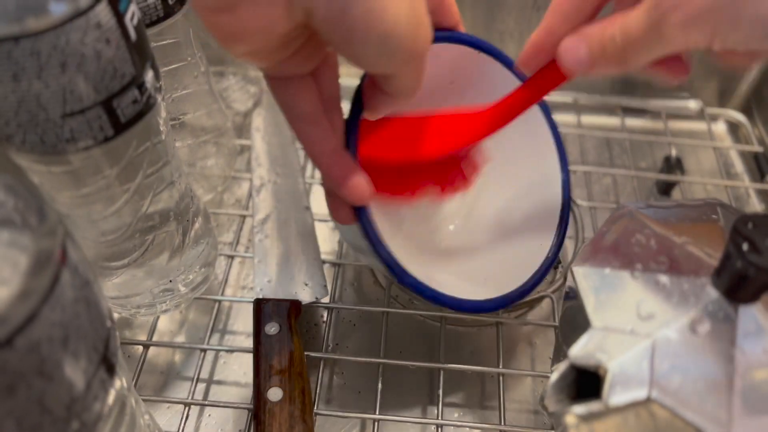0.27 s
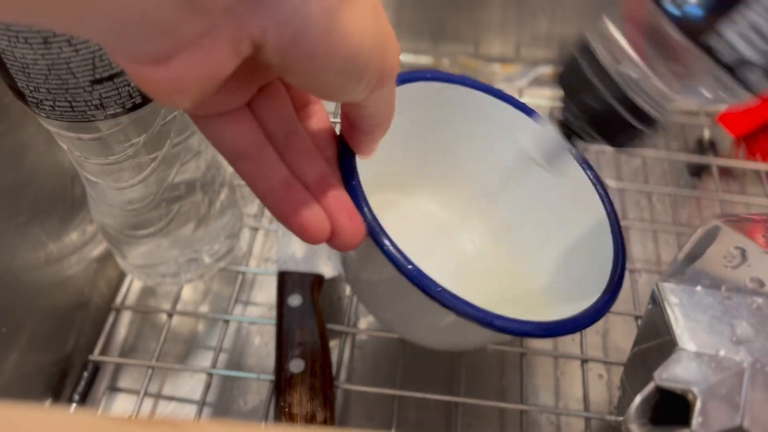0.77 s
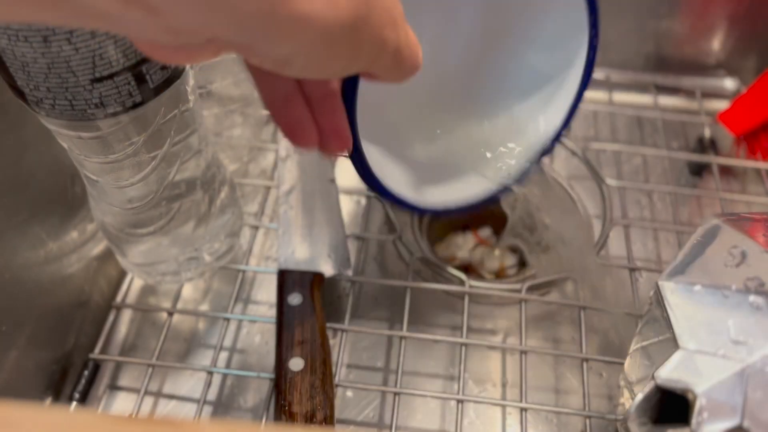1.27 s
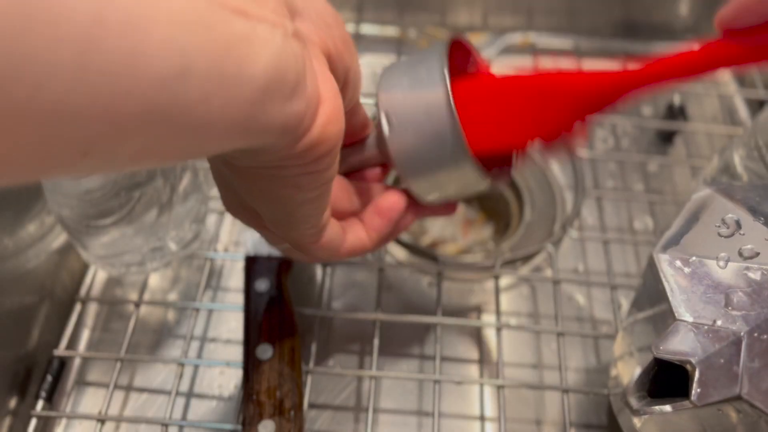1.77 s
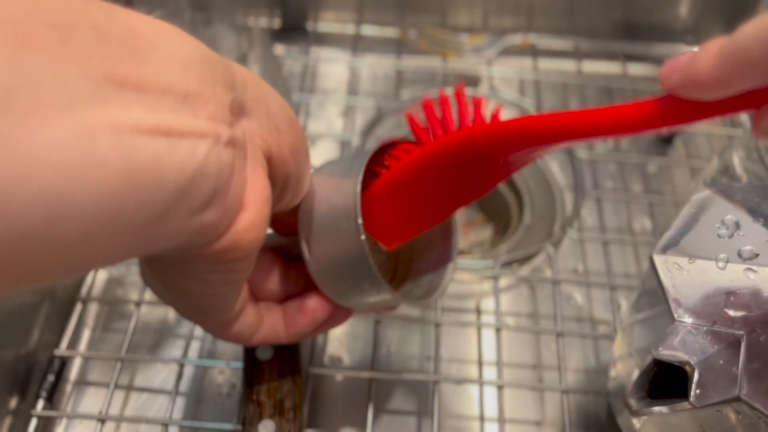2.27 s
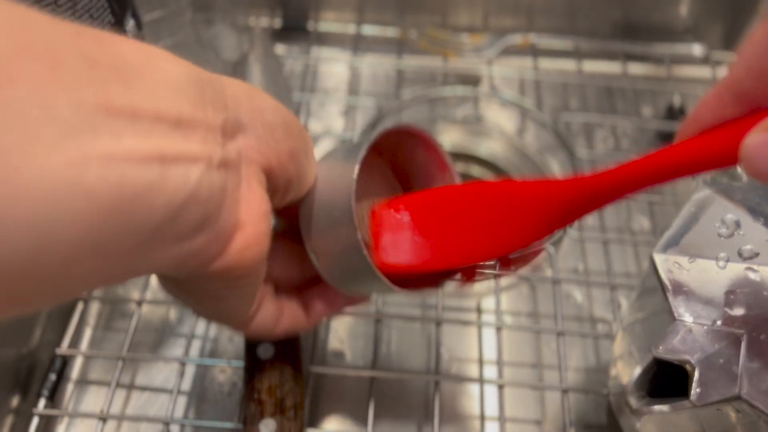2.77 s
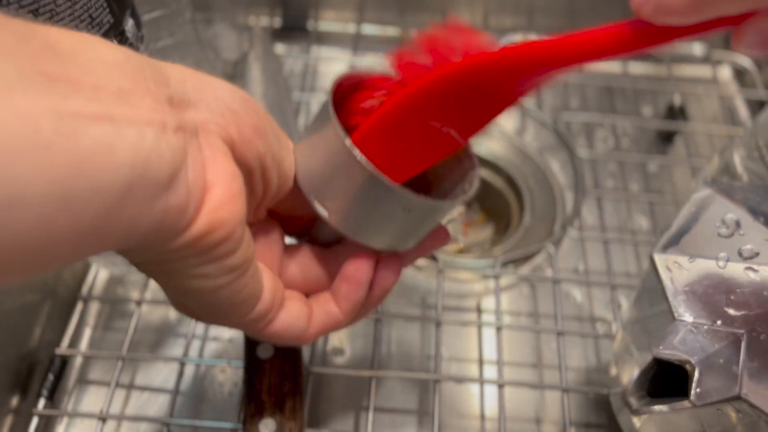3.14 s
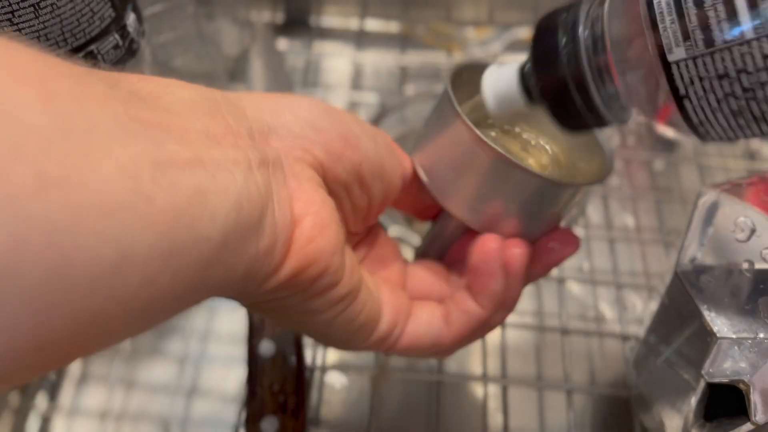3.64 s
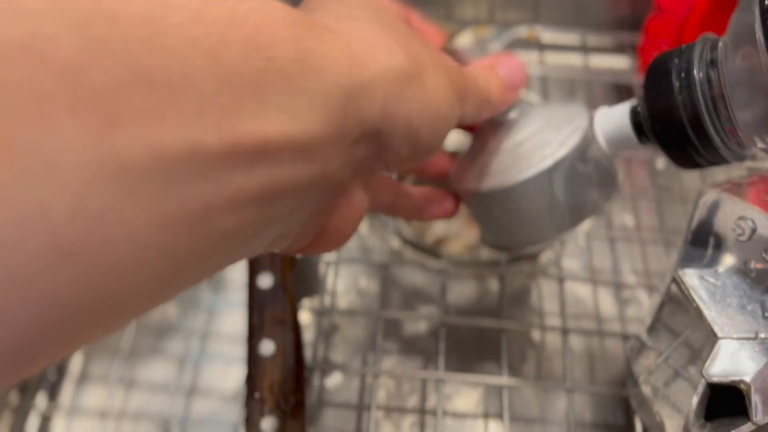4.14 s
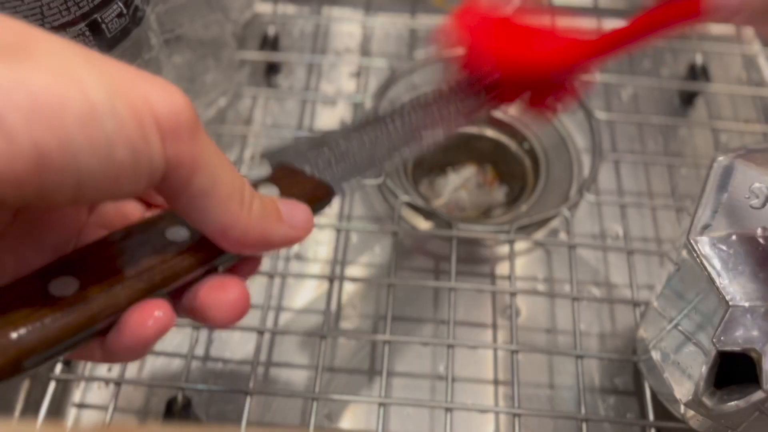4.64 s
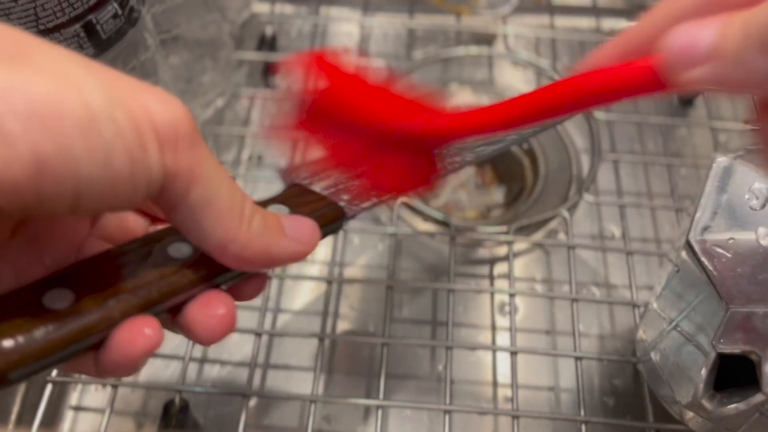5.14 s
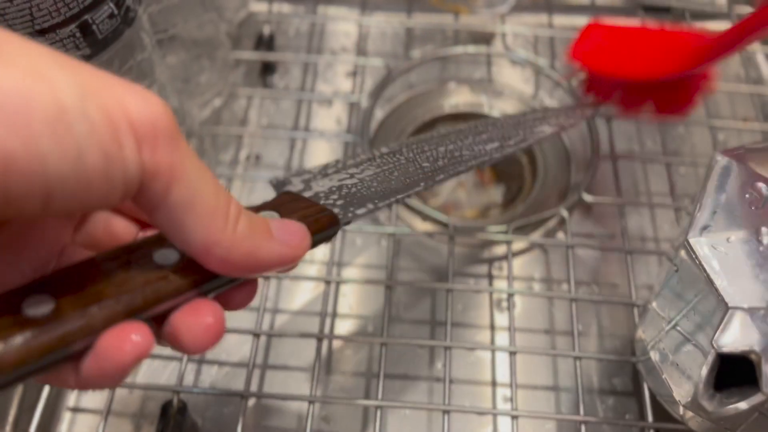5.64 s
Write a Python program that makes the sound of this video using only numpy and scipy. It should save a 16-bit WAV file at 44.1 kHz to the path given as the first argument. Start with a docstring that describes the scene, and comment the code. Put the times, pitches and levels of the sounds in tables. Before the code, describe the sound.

Dishes are scrubbed by hand in a steel sink, heard close up with a tight basin echo over a low kitchen rumble. First come hollow knocks of a brush in an enamel bowl, then sloshing suds and a spurt from a soap bottle. Scratchy twists and clanks follow inside a small metal funnel. After two more soap spurts, wet clicks and a dull finger rub, bright, rapid brush strokes run over a knife blade.

```python
"""A plastic brush knocks and turns in an enamel bowl, down in a steel sink, close to a phone's microphone.
Suds crackle, drip and gurgle, and a soap bottle sputters three times as air tears through its nozzle.
The brush twists in a small aluminium funnel, wet fingers roll the funnel over, and the bristles sweep
to and fro along a knife blade. Bristle flicks and knocks ring each dish's own resonances.
The basin echoes close by, and the kitchen's low drone lies under everything."""
import sys
import numpy as np
from scipy import signal
from scipy.fft import rfft, irfft, next_fast_len
from scipy.io import wavfile
from scipy.ndimage import uniform_filter1d, map_coordinates

SR = 44100
rng = np.random.default_rng(int(sys.argv[2]) if len(sys.argv) > 2 else 0)


def store_wav(level_fs):
    """Save 16-bit WAV to argv[1]."""
    pcm = np.round(np.clip(np.atleast_2d(level_fs), -1, 1) * 32767)
    wavfile.write(sys.argv[1], SR, pcm.T.astype(np.int16))


N = 260190
TIME = np.arange(N) / SR
SIDES = np.array([[.5], [-.5]])  # half of a difference goes to each microphone port

# Levels in the tables are relative. "Fastest" is the share of a movement at which its speed peaks.
# Turns of the brush in the bowl. Each row: start and length in seconds, fastest, level in dB.
BOWL_TURNS = [(0, 0.055, 0.53, -32), (0.081, 0.14, 0.13, -44.5), (0.332, 0.26, 0.24, -46.5)]
# The brush head striking each dish. Each row: time in seconds, level in dB, hollow low modes in dB,
# hard crack in dB, pitch ratio set by grip and brush depth.
BOWL_KNOCKS = [(.0098, -20, -1, 5.5, 1.08), (.0295, -19.5, 1.5, -0.5, 0.99),
               (.2625, -17.5, 1, -10.5, 1.046), (.2995, -20, -3, -1, 0.99), (.5038, -17, -8, 3.5, 1.02),
               (.523, -29.5, -2, -3.5, 1.03)]
FUNNEL_KNOCKS = [(1.431, -22, -23, 4.5, 0.95), (1.439, -25.5, -10, 3, 1), (1.476, -30, -5, -15, 0.94),
                 (1.54, -29, -3, -0.5, 1.04), (1.617, -10.5, 3.5, -2, 0.99), (1.869, -14, 6.5, -1.5, 1.02),
                 (1.879, -28.5, 17, 1, 1.03), (1.94, -35, 7, -3, 1.03), (1.958, -30.5, 13, 0.5, 1.07),
                 (1.999, -20.5, -14, -7.5, 0.98), (2.033, -26, -10, -13, 0.94),
                 (2.058, -23.5, -14, -4, 0.91), (2.298, -31, 8, -12, 1.02), (2.424, -26, -3, -2, 1.08),
                 (2.665, -37, 13, 0, 1.04), (2.883, -26, -13, 3, 1.07), (3.157, -35.5, 9, -9, 0.93),
                 (3.243, -30, 13, -2, 1.03), (3.277, -29.5, 1, -4, 0.93), (3.322, -28.5, -8, 1, 0.91),
                 (3.346, -33, 17.5, 3.5, 1.03)]
# What a knock rings. Each row: pitch in Hz, level in dB, t60 in seconds.
BOWL_MODES = [(415, -19.5, 0.032), (551, -7, 0.08), (640, 0, 0.016), (850, -6.5, 0.056), (967, -5, 0.037),
              (1485, 0.5, 0.028), (2020, 3.5, 0.016), (2190, -0.5, 0.016), (2305, -2, 0.025),
              (2510, -2, 0.017), (3100, -3, 0.024), (4050, -10.5, 0.035), (4650, -19, 0.035)]
FUNNEL_MODES = [(555.5, -11.5, 0.055), (885, -18, 0.03), (996, -19, 0.035), (1330, -6.5, 0.028),
                (1388, -2.5, 0.04), (1500, -4.5, 0.032), (1676, -9.5, 0.038), (1770, -5, 0.026),
                (1951, -13, 0.02), (2290, -11, 0.017), (3754, -14, 0.018), (4330, -9, 0.013)]
# Resonances that the bristles excite. Each row: centre and width in Hz, level in dB.
BOWL_RUB = [(1490, 73, -10.5), (2506, 51, 1), (3240, 150, -20), (4034, 33, -6.5), (4650, 65, -24.5),
            (4950, 50, -13), (5916, 44, -10), (6930, 77, -10)]
FUNNEL_RUB = [(554, 41, 1.5), (664, 85, -9), (1000, 46, -5), (1260, 22, -7.5), (1359, 38, 9.5),
              (1504, 53, 3.5), (1680, 82, 2), (1788, 56, 5), (2003, 62, 2.5), (2581, 108, -8),
              (3110, 300, -6.5), (3780, 102, -7.5)]
BLADE_RASP = [(1726, 860, -14), (2953, 200, -0.5), (3100, 300, -3), (4430, 750, -5), (5060, 510, -6),
              (6870, 420, 2.5)]
# Bristle hiss from close up. Each row: frequency in Hz, spectral level in dB.
BOWL_HISS = [(200, -24), (800, 1), (1200, -21.5), (3000, -27), (6000, -4), (8000, 18.5), (14000, 26.5),
             (16000, -11)]
FUNNEL_HISS = [(300, -20), (1500, -15), (2600, -5), (4200, -6), (6200, -5), (8500, -8), (11000, -0.5),
               (12800, 1.5), (14000, -1.5), (16000, -7.5)]
BLADE_HISS = [(300, -50), (1900, -24), (2500, -13.5), (2900, -12), (3500, -10), (4500, -5), (5800, -4),
              (8000, -1.5), (11000, 7.5), (14000, 4.5), (16000, 1.5)]

# The kitchen's rumble. Each row: frequency in Hz, spectral level in dB.
RUMBLE_SPECTRUM = [(20, -27), (35, -6.5), (50, 7.5), (95, 5), (125, 1), (175, -4.5), (260, -19),
                   (450, -11.5), (700, -15.5), (1000, -43), (2000, -65), (7000, -38.5)]
# The room's low resonances. Each row: centre and width in Hz, level in dB.
ROOM_MODES = [(58.6, 4.3, 4.5), (90.1, 10.3, -1), (166.55, 8.2, 2.5), (295, 18, -22.5), (389, 16, -14)]
# The swell of rumble and drone. Each row: time in seconds, level in dB.
DRONE_LEVEL = [(0, -55), (.45, -55), (1.65, -46.5), (4.2, -44.5), (5.2, -46), (5.8, -45.5)]

# Resting foam dying down. Each row: time in seconds, level in dB.
SUDS_THINNING = [(3.3, 1.5), (5.7, -7)]
# A tipped dish stirs the suds. Each row: time of the peak in seconds, crackle in dB.
SLOSHES = [(.68, -66), (0.889, -54), (1.33, -47), (3.39, -67.5), (4, -44.5), (4.33, -59.5), (4.48, -55)]
# Soapy water swilled and poured out. Each row: start and end in seconds, first and last level in dB,
# lower and upper air pocket in Hz.
GURGLES = [(0.58, 0.597, -48, -53, 1250, 2020), (0.614, 0.639, -42, -54, 1240, 2020),
           (0.707, 0.743, -40.5, -49.5, 1430, 2330), (0.756, 0.814, -50, -55, 1200, 2460),
           (0.833, 0.858, -48.5, -38.5, 1280, 2790), (0.877, 0.92, -53, -60, 1850, 2100),
           (1.222, 1.243, -49, -56, 1450, 2355), (1.286, 1.33, -55, -53, 1450, 2330),
           (1.379, 1.407, -42, -53, 980, 2040), (3.388, 3.402, -51, -54, 2640, 4350),
           (3.574, 3.71, -66, -55, 1790, 2010)]
# The loudest drips, and wet clicks of suds and fingers. Each row: time in seconds, pitch in Hz,
# level in dB.
DRIPS = [(0.679, 3240, -45), (.82, 1630, -39.5), (0.896, 2320, -38), (0.936, 2860, -33), (0.99, 3340, -42),
         (1.153, 4110, -38), (1.268, 1056, -31.5), (1.313, 2380, -34), (1.327, 4160, -27.5),
         (1.347, 3150, -29.5), (1.377, 965, -37), (3.4997, 4230, -51), (3.5604, 3490, -55),
         (4.025, 3200, -44), (4.05, 1784, -33.5), (4.106, 4300, -29), (4.169, 713, -28),
         (4.557, 4770, -38.5)]
WET_CLICKS = [(0.8804, 11000, -26), (0.966, 6500, -27.5), (1.354, 13000, -28), (3.579, 12670, -28.5),
              (3.641, 13000, -17.5), (3.814, 6850, -27), (3.825, 4100, -18), (4.052, 2300, -17),
              (4.071, 7000, -12.5), (4.172, 4000, -28), (4.289, 2640, -20.5), (4.376, 5000, -29.5),
              (4.447, 7000, -28), (4.4786, 8700, -16.5), (4.504, 6060, -33), (4.5954, 10940, -24.5),
              (5.759, 11100, -34), (5.839, 11400, -33)]

# Air and soap leaving the nozzle. Each row: start and length in seconds, first and last level in dB.
SPURTS = [(1.029, 0.03, -28, -24.5), (1.061, 0.021, -26.5, -30), (1.087, 0.0194, -28, -53.5),
          (3.7034, 0.0096, -25.5, -28.5), (3.715, 0.057, -44.5, -59), (3.934, 0.0064, -23, -34.5),
          (3.946, 0.053, -24, -42.5)]
# The rush of that air. Each row: frequency in Hz, spectral level in dB.
SPURT_AIR = [(80, -1), (200, 1.5), (310, 3), (500, -10), (900, -5.5), (1400, -11.5), (2400, -7),
             (3800, -12.5), (5600, -1.5), (7000, -3.5), (8000, -10.5), (12500, -6), (16000, -24)]
# The wet nozzle's resonances. Each row: centre and width in Hz, level in dB.
NOZZLE_MODES = [(852, 170, 1), (1010, 38, -4.5), (1900, 99, -4), (2400, 59, -3.5), (2800, 180, -2.5),
                (5020, 160, -5), (5560, 180, -5.5)]
# Slugs of soap popping. Each row: time in seconds, pitch in Hz, level in dB, t60 in seconds,
# left minus right in dB.
SOAP_POPS = [(1.026, 2560, -14, 0.009, 0), (1.033, 985, -25, 0.072, 10), (1.053, 2325, -23, 0.029, 2),
             (1.056, 260, -30, 0.086, 3), (1.062, 856, -25, 0.043, 1), (1.078, 905, -21, 0.051, 1),
             (1.083, 252.8, -19.5, 0.04, 0), (1.101, 260, -13, 0.02, 0), (3.7046, 4330, -11, 0.017, -3),
             (3.706, 1340, -14, 0.0099, -7), (3.7064, 356, -5, 0.021, -7), (3.707, 168, -17.5, 0.11, -2.5),
             (3.744, 825, -21.5, 0.0098, 0), (3.9361, 5750, -7, 0.02, 0), (3.9379, 4880, -5.5, 0.0074, -2),
             (3.9357, 1390, -21.5, 0.052, 2), (3.96, 984, -26.5, 0.084, 6), (4.004, 283, -8.5, 0.0097, 2)]

# Twists of the brush in the funnel. Each row: start and length in seconds, fastest, level in dB,
# the cavity's share in dB, set by brush depth.
FUNNEL_TWISTS = [(1.455, 0.22, 0.57, -53, -12), (1.691, 0.22, 0.49, -42, -6), (2.041, 0.18, 0.13, -39, -3),
                 (2.302, 0.26, 0.65, -38, -6), (2.629, 0.33, 0.63, -38, -8.5), (3.089, 0.25, 0.54, -37, -4)]
# Tufts springing free over the rim. Each row: time in seconds, level in dB.
TUFT_SNAPS = [(1.458, -44.5), (1.487, -40.5), (1.524, -46), (1.564, -45.5), (1.706, -39), (2.059, -29.5),
              (2.185, -50), (2.655, -41), (2.955, -46), (2.99, -39.5), (3.02, -48.5), (3.074, -41),
              (3.157, -28), (3.217, -28), (3.274, -31)]
# The wet head dragging on the funnel's wall, its plastic scraping there, and fingers turning the funnel.
# Each row: start and end in seconds, first and last level in dB.
GROANS = [(1.72, 1.862, -52, -41), (1.88, 1.977, -41, -33), (3.097, 3.197, -46.5, -49)]
SCRAPES = [(2.06, 2.093, -28.5, -34.5), (2.13, 2.172, -39, -37), (2.3, 2.345, -42.5, -41.5),
           (2.386, 2.436, -39.5, -33), (2.527, 2.535, -42, -43), (2.61, 2.61, -48, -48),
           (2.752, 2.83, -39, -39)]
FINGER_RUBS = [(4.482, 4.58, -35.5, -43)]

# Sweeps to the blade's tip and back. Each row: start and length in seconds, fastest, level in dB,
# the rasp's share in dB.
BLADE_SWEEPS = [(4.643, 0.1, 0.46, -30.5, -22), (4.737, .1, 0.2, -31, -19), (4.832, 0.11, 0.36, -28.5, -18),
                (4.938, 0.13, 0.12, -30.5, -16), (5.047, 0.095, 0.33, -24.5, -13),
                (5.143, .11, 0.092, -32, -11), (5.229, 0.12, 0.5, -32, -12.5),
                (5.328, 0.13, 0.204, -37.5, -12), (5.435, 0.12, 0.55, -32, -18),
                (5.535, 0.16, 0.14, -32.5, -10)]
# Bristles catching on the edge. Each row: time in seconds, level in dB.
EDGE_CATCHES = [(4.75, -34.5), (4.845, -40.5), (4.917, -27.5), (4.946, -26.5), (4.962, -37), (5.057, -31),
                (5.11, -34), (5.215, -45), (5.322, -32.5), (5.358, -34.5), (5.52, -31.5), (5.565, -39.5),
                (5.655, -43.5)]

# Phase between the microphone ports. Each row: frequency in Hz, left's lead in radians.
PORT_PHASE = [(100, 0), (250, .45), (450, .85), (750, .8), (1050, .2), (1400, -1.3), (1850, .1),
              (3000, 1.1), (4000, .4), (4900, .9), (5600, -.9), (6800, -1.4), (7800, -3), (9300, -3.4),
              (10800, -6.28), (12800, -6.35), (13900, -7), (15200, -9)]
# Balance between the ports. Each row: frequency in Hz, left minus right in dB.
PORT_BALANCE = [(60, -.5), (150, -2), (280, -5), (450, -.5), (1300, -.5), (2400, 2), (3800, 2), (4900, 5),
                (6500, 2), (8000, 0)]


def amp(db):
    """Decibels as a gain."""
    return 10 ** (np.asarray(db) / 20)


def unit(x):
    """x at rms 1."""
    return x / np.sqrt(np.mean(x ** 2) + 1e-20)


def along(points, hz):
    """A curve through (Hz, value) points on a log frequency axis."""
    f, v = np.transpose(points)
    return np.interp(np.log(hz + 1), np.log(f + 1), v)


def wobble(rate):
    """A smooth random curve, rate knots a second."""
    return map_coordinates(rng.standard_normal(int(N * rate / SR) + 4), [TIME * rate])


def filtered(x, response):
    """x through a response given as a function of frequency."""
    size = next_fast_len(N + SR // 4)
    return irfft(rfft(x, size) * response(np.fft.rfftfreq(size, 1 / SR)), size)[..., :N]


def coloured(x, spectrum):
    """x shaped by a (Hz, dB) spectrum, at rms 1."""
    return unit(filtered(x, lambda hz: amp(along(spectrum, hz))))


def resonant(x, peaks):
    """x through (Hz, width in Hz, dB) resonances of alternating sign, at rms 1."""
    def response(f):
        return sum((-1) ** k * amp(db) * 1j * f * width / (hz * hz - f * f + 1j * f * width)
                   for k, (hz, width, db) in enumerate(peaks))
    return unit(filtered(x, response))


def patchy(x, depth_db):
    """Colour that shifts from moment to moment as the contact moves, at rms 1."""
    spectra = signal.stft(x, nperseg=512)[2]
    patches = uniform_filter1d(rng.standard_normal(spectra.shape), size=5, axis=0)
    patches = uniform_filter1d(patches, size=7, axis=1)
    return unit(signal.istft(spectra * amp(depth_db * unit(patches)), nperseg=512)[1][:N])


def wandering(x, share, rate):
    """All resonances of x drift up and down together by a share of their pitch."""
    return unit(map_coordinates(x, [np.cumsum(1 + share * wobble(rate))], mode="mirror"))


def add(track, s, sound):
    """Mix a sound into a track at s seconds."""
    part = track[..., max(round(s * SR), 0):][..., :sound.shape[-1]]
    part += sound[..., :part.shape[-1]]


def flicks(rate, spread_db, clump_db):
    """Tiny impulses of uneven size that come in clumps, at rms 1."""
    hits = (rng.random(N) < rate / SR) * rng.choice([-1, 1], N)
    size_db = spread_db * np.clip(rng.standard_normal(N), -2, 2)
    return unit(hits * amp(size_db + clump_db * wobble(130)))


def stroke(start, end, first_db, last_db, edge):
    """A gain that opens over edge seconds, slides from one level to another and closes."""
    gain = np.zeros(N)
    inside = slice(*np.searchsorted(TIME, [start - edge, end + edge]))
    t = TIME[inside]
    gate = np.clip((t - start) / edge + .5, 0, 1) * np.clip((end - t) / edge + .5, 0, 1)
    gain[inside] = gate * amp(np.interp(t, [start, end], [first_db, last_db]))
    return gain


def swing(start, length, fastest):
    """Speed of one turn of the wrist: from rest up to 1 and back to rest."""
    peak = start + np.clip(fastest, .05, .95) * length
    return np.sin(np.pi / 2 * np.interp(TIME, [start, peak, start + length], [0, 1, 0]))


def snaps(rows, t60):
    """A gain that jumps up at each (seconds, dB) row and dies away."""
    gain, t = np.zeros(N), np.arange(SR // 6) / SR
    for s, db in rows:
        add(gain, s, amp(db - 60 * t / t60) * (1 - np.exp(-t / 0.001)))
    return gain


def knocks(rows, modes, crack_db, crack_t60, chatter_db, chatter_s, loosens, port_radians):
    """The brush head lands and rings hand-damped modes; its chatter shakes the upper ones again."""
    hollow_hz, hard_hz, grip_detune = 1100, 3000, .016
    firm_db = -19  # softer knocks chatter for longer, harder ones land cleanly
    out, t = np.zeros((2, N)), np.arange(SR // 6) / SR
    for s, db, low_db, hard_db, tuning in rows:
        chatter = min(chatter_s * amp(loosens * (firm_db - db)), .014)
        ring = np.zeros((2, len(t)))
        for hz, mode_db, t60 in modes:
            mode_db += low_db * (hz < hollow_hz) + min(hard_db, 0) * (hz > hard_hz)
            mode_db += rng.normal(0, np.sqrt(hz / 1800))  # upper modes feel the contact point most
            pitch = hz * tuning * (1 + rng.normal(0, grip_detune))
            phase = 2 * np.pi * (pitch * t + rng.random())
            port_shift = SIDES * port_radians * rng.standard_normal()
            ring += amp(mode_db - 60 * t / t60) * np.sin(phase + port_shift)
        ring *= 1 - np.exp(-t / 0.0013)
        bounces = np.diff(rng.standard_normal(len(t) + 1)) * np.exp(-t / chatter)
        bounces /= np.linalg.norm(bounces)
        rattle = amp(chatter_db) * signal.fftconvolve(ring, bounces[None])[:, :len(t)]
        crack = amp(crack_db + hard_db - 60 * t / (crack_t60 + 2 * chatter))
        crack *= rng.standard_normal(len(t)) * (1 - np.exp(-t / 0.00098))
        add(out, s, amp(db) * (ring + rattle + crack))
    return out


def bowl():
    """Right by the microphone, bristles flick over enamel and the brush head strikes the bowl's wall."""
    pressure = sum(amp(db) * swing(*turn) ** 1.2 for *turn, db in BOWL_TURNS)  # faster is louder
    pressure += stroke(0, 0.592, -52, -59, edge=0.018)
    bristles = patchy(flicks(rate=3700, spread_db=1, clump_db=1), depth_db=4)
    scrub = amp(-3.5) * coloured(bristles, BOWL_HISS) + amp(0.8) * resonant(bristles, BOWL_RUB)
    strikes = knocks(BOWL_KNOCKS, BOWL_MODES, crack_db=-4, crack_t60=0.028,
                     chatter_db=9, chatter_s=0.0064, loosens=4.4, port_radians=1.33)
    return pressure * scrub + strikes


def kitchen():
    """Room tone behind the sink: a low rumble drones in the room's resonances, over a faint hiss."""
    level = amp(np.interp(TIME, *np.transpose(DRONE_LEVEL)))
    rumble = coloured(rng.standard_normal(N), RUMBLE_SPECTRUM)
    modes = resonant(rng.standard_normal(N), ROOM_MODES)
    drone = amp(1) * filtered(modes, lambda f: f ** 4 / (f ** 4 + 40 ** 4))
    air_spectrum = [(25, -23), (70, -4), (350, -3), (1000, -2), (5000, -17), (15000, -64)]
    air = amp(-62.5) * coloured(rng.standard_normal((2, N)), air_spectrum)
    return level * (rumble + drone) + air


def stirred(s, rise_s=0.051, settle_s=0.074):
    """How lively the suds are at s seconds: each slosh wells up and settles to a simmer."""
    simmer = amp(-69 + np.interp(s, *np.transpose(SUDS_THINNING)))
    return simmer + sum(amp(db) * np.exp(np.minimum((s - peak) / rise_s, (peak - s) / settle_s))
                        for peak, db in SLOSHES)


def bubbles(rows, rise):
    """Soft-starting tones that rise as they die. Each row: seconds, Hz, dB, t60 in seconds."""
    out = np.zeros(N)
    for s, hz, db, t60 in rows:
        t = np.arange(int(t60 * SR) + 2) / SR
        envelope = amp(db - 60 * t / t60) * (1 - np.exp(-2 * t * hz))
        add(out, s, envelope * np.sin(2 * np.pi * hz * t * (1 + rise * t / t60)))
    return out


def suds(count=2200):
    """Small bubbles burst in the sink with tiny rings and a fizz, louder when the water is stirred."""
    when, pitch, size = rng.random(count), rng.standard_normal(count), rng.random(count)
    hz = np.clip(4000 * np.exp(.65 * pitch), 700, 14000)
    foam = unit(bubbles(zip(when * N / SR, hz, 20 * size ** 2, 24 / hz), rise=0.0308))
    bursts = patchy(flicks(rate=1700, spread_db=6.5, clump_db=5), depth_db=7)
    fizz = coloured(bursts, [(400, -39), (1800, -7), (5000, -10), (9000, -8), (15000, -9)])
    return stirred(TIME) * (amp(-4.5) * foam + amp(4.5) * fizz)


def gurgles(width_hz=81):
    """Each swill traps two pockets of air, which ring at their own pitches as foam bursts in them."""
    out = np.zeros(N)
    bursts = flicks(rate=1500, spread_db=3, clump_db=2)
    pocket = lambda hz: unit(signal.lfilter(*signal.iirpeak(hz, hz / width_hz, SR), bursts))
    for *swill, low_hz, high_hz in GURGLES:
        out += stroke(*swill, edge=0.021) * (amp(-6.5) * pocket(low_hz) + pocket(high_hz))
    return out


def drips(faint_count=150, t60_at_1khz=0.064):
    """Drips ring as bubbles, the smaller dying sooner; faint ones follow the stirring in level."""
    when, pitch, size = rng.random((faint_count, 3)).T
    times = when * N / SR
    faint = zip(times, 1400 * 3.2 ** pitch, 20 * np.log10(stirred(times)) + 3 + 10 * size)
    rows = [(s, hz, db, t60_at_1khz * (1000 / hz) ** 0.75) for s, hz, db in [*DRIPS, *faint]]
    return bubbles(rows, rise=0.033)


def splats(cushion_s=.0012):
    """Wet clicks and landing drips: short sprays of noise around one pitch, cushioned by foam."""
    out, t = np.zeros(N), np.arange(SR // 10) / SR
    onset = 1 - np.exp(-t / cushion_s)
    for rows, trim_db, t60 in [(WET_CLICKS, -11.5, 0.036), (DRIPS, -6, 0.06)]:
        for s, hz, db in rows:
            spray = signal.lfilter(*signal.iirpeak(hz, 1.8, SR), rng.standard_normal(len(t)))
            add(out, s, unit(spray) * onset * amp(db + trim_db - 60 * t / t60))
    return filtered(out, lambda f: f / (f + 1000))


def soap_bottle():
    """Air tears through soap and sounds the wet nozzle, with pops as slugs of it let go."""
    flow = sum(stroke(s, s + length, first, last, edge=0.00059) for s, length, first, last in SPURTS)
    air = coloured(flicks(rate=6000, spread_db=2.5, clump_db=2), SPURT_AIR)
    nozzle = resonant(flicks(rate=3000, spread_db=1, clump_db=1), NOZZLE_MODES)
    nozzle = wandering(nozzle, share=.025, rate=60)
    pops = sum(amp(SIDES * pan_db) * bubbles([pop], rise=0.036) for *pop, pan_db in SOAP_POPS)
    return flow * (amp(.5) * air + amp(-1.5) * nozzle) + pops


def funnel():
    """The brush twists in the funnel: tips bite, tufts spring free, the head retunes the cavity."""
    contact_s = (1.69, 3.04)  # the bristles stay on the wall between these times
    groan_hz = 585  # lowest resonance with the brush head at the mouth
    snap = snaps(TUFT_SNAPS, t60=0.099)
    tip_level = stroke(*contact_s, -59, -54, edge=0.03) + amp(-3) * snap
    tuft_level = stroke(*contact_s, -48, -50, edge=0.085) + amp(-26) * snap
    for start, length, fastest, db, depth_db in FUNNEL_TWISTS:
        slowness = 1 - swing(start, length, fastest)
        bite = stroke(start, start + length, db, db, edge=0.012)
        hollow = stroke(start, start + length, db, db, edge=0.025)
        tip_level = np.hypot(tip_level, bite * amp(-6 * slowness))
        tuft_level = np.hypot(tuft_level, hollow * amp(depth_db - 4.5 * slowness))
    fine = flicks(rate=5000, spread_db=4, clump_db=1.3)
    coarse = flicks(rate=800, spread_db=3.5, clump_db=2)
    tips = amp(2) * coloured(patchy(fine, depth_db=3), FUNNEL_HISS)
    cavity = resonant(patchy(coarse, depth_db=2), FUNNEL_RUB)
    tufts = amp(3) * wandering(cavity, share=.011, rate=9)
    groan = sum(stroke(*row, edge=0.017) for row in GROANS) * resonant(coarse, [(groan_hz, 35, 0)])
    scrape_level = sum(stroke(*row, edge=0.008) for row in SCRAPES)
    strikes = knocks(FUNNEL_KNOCKS, FUNNEL_MODES, crack_db=-6, crack_t60=0.017,
                     chatter_db=14.5, chatter_s=0.0071, loosens=0.92, port_radians=0.92)
    return tip_level * tips + np.hypot(tuft_level, scrape_level) * tufts + groan + strikes


def fingers():
    """Wet fingers roll the funnel over: a dull rub with a little fizz."""
    grip = sum(stroke(*row, edge=0.03) for row in FINGER_RUBS)
    slips = patchy(flicks(rate=2000, spread_db=4, clump_db=3), depth_db=5)
    spectrum = [(80, 2), (310, 1.5), (700, -9.5), (2000, -30.5), (7000, -18), (14000, -21)]
    return grip * coloured(slips, spectrum)


def knife():
    """Bristles swish brightly over the flat blade and rasp where they drag or catch the edge."""
    fine = flicks(rate=3500, spread_db=3, clump_db=2)
    coarse = flicks(rate=650, spread_db=3.5, clump_db=1.5)
    swish = amp(1) * coloured(patchy(fine, depth_db=2.5), BLADE_HISS)
    rasp = amp(-2.5) * resonant(patchy(coarse, depth_db=3.5), BLADE_RASP)
    swish_level = stroke(4.6, 5.68, -51, -50, edge=0.012)
    rasp_level = snaps(EDGE_CATCHES, t60=0.1)
    for start, length, fastest, db, rasp_db in BLADE_SWEEPS:
        sweep = amp(db) * swing(start, length, fastest) ** 0.73  # faster is louder
        swish_level = np.hypot(swish_level, sweep)
        rasp_level = np.hypot(rasp_level, amp(rasp_db) * sweep)
    return swish_level * swish + rasp_level * rasp


def echoes(x, t60, delay, low_hz):
    """Dense reflections, different at each port, weak in the bass and the top octave."""
    t = np.arange(SR // 3) / SR
    tail = rng.standard_normal((2, len(t))) * amp(-60 * t / t60) * np.clip(t / delay - 1, 0, 1)
    tail /= np.linalg.norm(tail, axis=1, keepdims=True)
    wet = signal.fftconvolve(x[None], tail, axes=1)[:, :N]
    return filtered(wet, lambda f: f ** 2 / (f ** 2 + low_hz ** 2) / np.sqrt(1 + (f / 8500) ** 8))


def scene():
    """Close at the sink: the steel basin answers at once, the kitchen faintly after it."""
    water = suds() + gurgles() + drips() + splats()
    direct = bowl() + water + soap_bottle() + funnel() + fingers() + knife()
    basin = amp(-8) * echoes(direct.mean(axis=0), t60=0.046, delay=0.0019, low_hz=280)
    room = amp(-22.5) * echoes(direct.mean(axis=0), t60=0.12, delay=0.0082, low_hz=246)
    return amp(-2) * direct + basin + room + kitchen()


def record(dry):
    """The phone's two microphone ports differ in phase and level; nothing passes its band limit."""
    top_hz = 15850
    phase = lambda hz: np.exp(1j * SIDES * along(PORT_PHASE, hz))
    balance = lambda hz: amp(SIDES * along(PORT_BALANCE, hz))
    return filtered(dry, lambda hz: phase(hz) * balance(hz) * (hz < top_hz))


dry = scene()
out = record(dry)
store_wav(out)
```